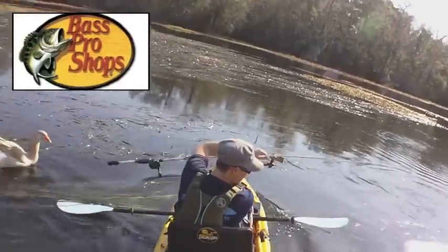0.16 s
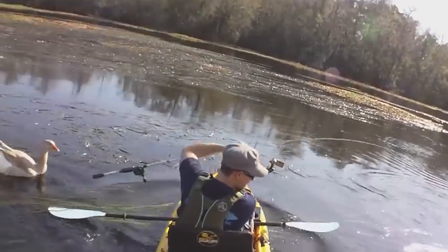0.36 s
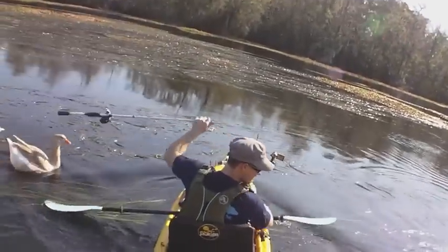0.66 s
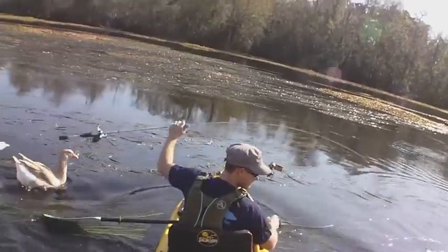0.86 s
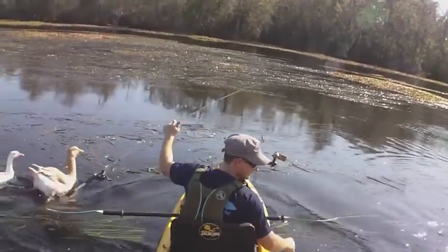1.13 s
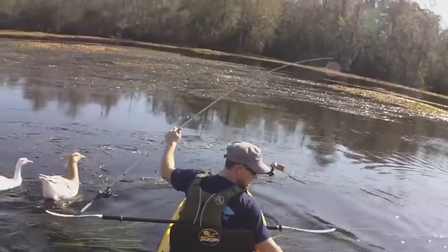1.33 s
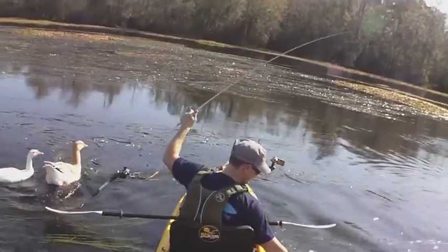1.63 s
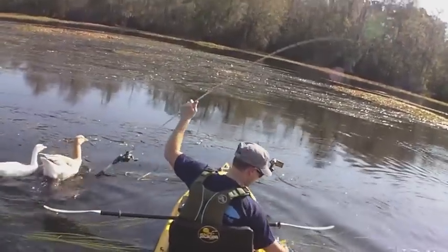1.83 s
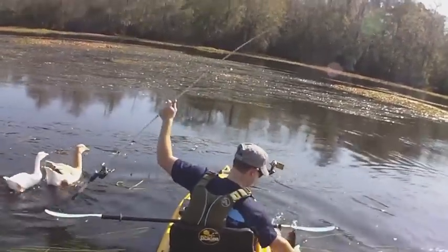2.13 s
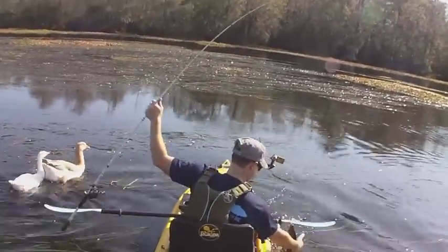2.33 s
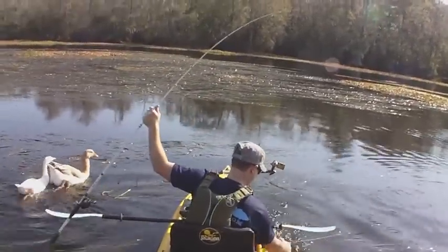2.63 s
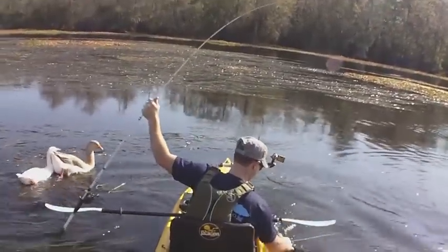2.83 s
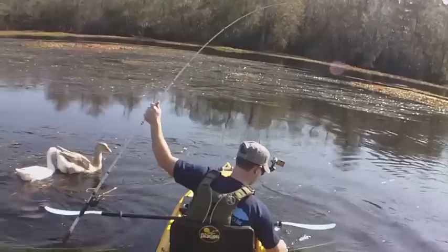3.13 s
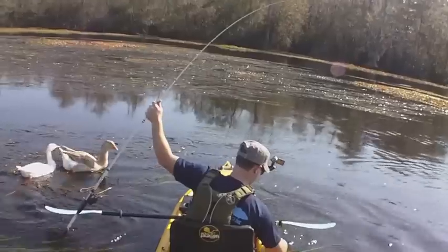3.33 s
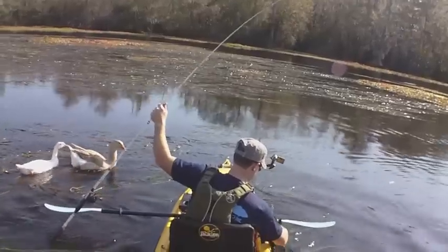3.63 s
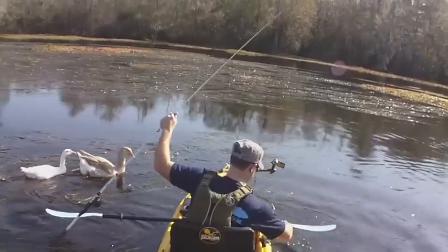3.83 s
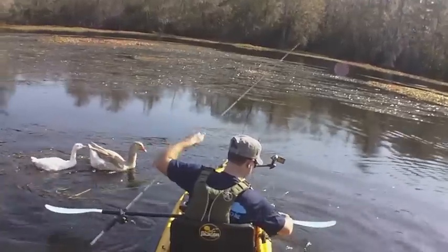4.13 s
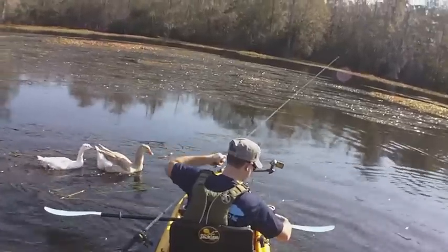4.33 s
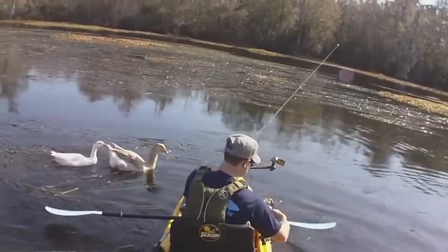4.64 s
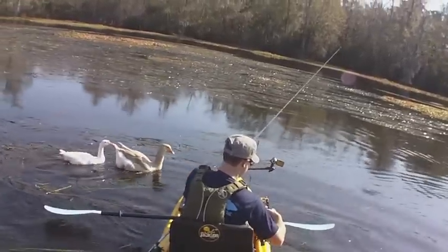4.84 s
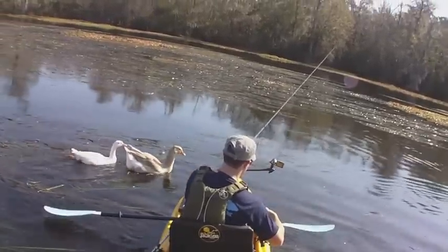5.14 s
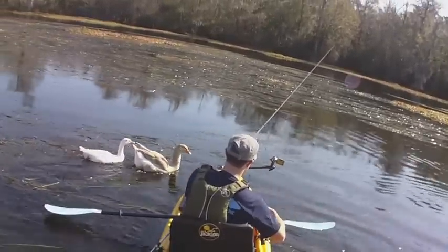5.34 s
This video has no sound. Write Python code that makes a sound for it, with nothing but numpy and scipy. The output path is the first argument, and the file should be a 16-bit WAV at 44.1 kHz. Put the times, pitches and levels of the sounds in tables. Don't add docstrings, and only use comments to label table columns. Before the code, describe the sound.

A close, dry outdoor stereo pickup from a small camera on a kayak: soft hiss, a thin steady high whine, and low wind rumble buffeting left and right unevenly. At the start water slops and gurgles gently against the plastic hull, with small low splashes around 0.4 to 0.8 seconds. From about 1.0 a hooked fish thrashes: bubbly plops, brighter wash, fine spray and a ringing rattle of steel beads in a hard lure shell near 1.2. The strongest wet slaps come around 1.8 and 2.0, with clustered bright rattles until about 2.5. The water then thins to droplets and trickles, with a small splash and faint rattle near 3.3, and is nearly still around 4. At 4.6 one hard, sharp knock hits the hull with an immediate tiny rebound, followed by small plips and a slosh near 4.9. A heavy wind thump hits the left at 5.1.

```python
import sys
import numpy as np
from scipy import signal
from scipy.fft import rfft, irfft, next_fast_len
from scipy.io import wavfile
from scipy.ndimage import uniform_filter1d

SR = 44100
rng = np.random.default_rng(int(sys.argv[2]) if len(sys.argv) > 2 else 0)


def transcribe(signal):
    frames = np.atleast_2d(signal).T
    limited = np.clip(frames, -1, 1)
    pcm = np.round(limited * 32767).astype(np.int16)
    wavfile.write(sys.argv[1], SR, pcm)


def magnitude_from_level(level_db):
    exponent = np.asarray(level_db, float) / 20
    return 10 ** exponent


N = 242197

# frequency in Hz, level in dB per Hz.
HISS_SPECTRUM = [(150, -27), (280, -2.5), (1200, -2.5), (3000, -4.5), (6800, -11), (8200, -16.5),
                 (11300, -16.5), (11700, -12.5), (15000, -11.5)]
# frequency in Hz, left level in dB, right level in dB, left lead in radians.
WHINE_TONE = (7866.5, -40, -39.5, 1.5)
# time in seconds, gust level in dB, left over right in dB.
WIND_GUSTS = [(0.0, -31, -12), (0.09, -36.5, 16), (0.15, -40.5, 0.5), (0.44, -31.5, 3), (0.69, -45.5, 3),
              (0.83, -36.5, 9), (1.08, -49, 4.5), (1.24, -26.5, 4), (1.44, -46, 2), (1.48, -32, 0.5),
              (1.59, -41.5, 8), (2.25, -35.5, 7), (2.74, -43, 1.5), (3.35, -41, 8.5), (3.38, -31.5, 14),
              (3.45, -42.5, 1), (3.82, -43.5, 7.5), (4.3, -40, 6), (4.4, -55, -5.0), (4.45, -43.5, 15),
              (4.59, -34, -2), (4.88, -38.5, 7.5), (5.0, -36.5, -6), (5.07, -26.5, 11), (5.14, -42.5, -2),
              (5.29, -47.5, 2), (5.35, -37, 17.5), (5.49, -42, -9)]
# frequency in Hz, level in dB per Hz.
LIGHT_AIR = [(8.8, -34.5), (15, 13), (42, -4), (65, -23.5), (135, -29), (445, -50.5), (500, -43.5),
             (650, -55), (1100, -120)]
# frequency in Hz, level in dB per Hz.
FULL_GUST = [(8.8, -38), (15, -6), (134, 1), (170, -3.5), (247, -13), (420, -16.5), (550, -38), (920, -120)]
# time in seconds, peak in dB, frequency in Hz, left over right in dB, push-pull phase in radians.
EDDIES = [
    (0.09, -18, 91.5, 17, 0.69),
    (0.383, -37, 121, -1, 0.98),
    (1.249, -19, 139, 11, 0.54),
    (1.491, -21, 66, 0, 0.42),
    (3.378, -16.5, 51.1, 3, 0.8),
    (4.717, -14.5, 120.4, 12, 0.8),
    (5.029, -34.5, 59.2, 1.5, 0.8),
    (5.069, -5.5, 100, 19, 0.92),
    (5.359, -41.5, 51.1, 5.0, 0.8),
]
# time in seconds, slosh in dB, brightness of its upper half in dB.
HULL_SLOSH = [(0, -36.5, -12), (.05, -43, -3.5), (.4, -43.5, -10.5), (.43, -33, -22), (.47, -40.5, -15),
              (.54, -43.5, -16), (.62, -62, -8), (.78, -51.5, -4), (.815, -38, -8), (.83, -32, -15.5),
              (.99, -34.5, -18), (1.02, -32.5, -0.5), (1.09, -32.5, -10.5), (1.13, -25.5, -9),
              (1.17, -32.5, -2), (1.22, -29.5, -4), (1.37, -34, -3.5), (1.39, -42, -2), (1.43, -45, -4),
              (1.45, -29.5, -12), (1.48, -46.5, -1), (1.57, -41, 1), (1.63, -33.5, -3), (1.67, -42, -0.5),
              (1.765, -33.5, -11), (1.81, -35.5, -3), (1.93, -29.5, -8.5), (2.0, -30, -7), (2.1, -39, -7),
              (2.2, -39, -4), (2.23, -50.5, 4), (2.42, -42.5, 3), (2.5, -50.5, 0), (2.7, -54.5, 0),
              (2.76, -47, -15), (2.83, -60, -4), (3.18, -62, -8), (3.24, -49, -12), (3.32, -52.5, -1),
              (3.6, -67, -4), (4.62, -72, -8), (4.64, -50, -6), (4.68, -61, 0), (4.9, -50, -4),
              (5.0, -63, -11)]
# time in seconds, spray in dB, gurgle in dB.
SPRAY_AND_GURGLE = [(0, -53.5, -41), (.38, -58, -43.5), (.45, -59.5, -32.5), (.6, -64, -60),
                    (.75, -55.5, -59), (.85, -47, -60), (1.0, -48.5, -56), (1.03, -38.5, -62),
                    (1.25, -37.5, -40.5), (1.38, -39, -49), (1.41, -39.5, -66), (1.59, -41.5, -60),
                    (1.96, -37.5, -53), (2.18, -46, -45), (2.48, -53, -64.5), (2.95, -58, -60),
                    (3.3, -58, -62.5), (3.7, -65.5, -60.5)]
# frequency in Hz, level in dB per Hz.
SLOSH_SPECTRUM = [(120, -43.5), (200, -0.5), (343, -8.5), (446, -9), (580, 1.5), (700, -2.5), (878, -0.5),
                  (1770, -0.5), (3040, -10.5), (4000, -14.5), (5200, -45.5), (8800, -120)]
# frequency in Hz, level in dB per Hz.
SPRAY_SPECTRUM = [(1500, -9), (3000, -11.5), (4500, 1), (6000, -0.5), (8000, -1.5), (11000, -1.5),
                  (14000, -6), (15500, -16.5)]
# start in seconds, end in seconds.
THIN_HISS_LULLS = [(.35, 0.41), (.42, .46), (.62, 0.75), (2.91, 3.13), (3.2, 3.24), (3.55, 3.69), (3.76, 3.8),
                   (3.88, 4.29), (4.42, 4.47), (4.88, 5.13), (5.22, 5.28), (5.35, 5.49)]
# time in seconds, peak in dB, centre in Hz, relative treble in dB, length in seconds.
TAIL_SLAPS = [(0.027, -27, 1650, -1.5, 0.012), (0.417, -25, 550, -32, 0.01), (0.499, -23, 615, -25, 0.02),
              (0.528, -19.5, 643, -32, 0.0064), (0.753, -38, 2040, -5, 0.012),
              (0.827, -22.5, 890, -11.5, 0.026), (1.439, -19, 630, -22, 0.012),
              (1.778, -13, 487, -8, 0.011), (1.783, -8.5, 1250, -19.5, 0.01),
              (2.014, -10.5, 2850, -1, 0.013), (2.026, -18.5, 525, -20, 0.02),
              (2.077, -10.5, 1730, -21, 0.008), (2.246, -25.5, 1510, -12, 0.0048),
              (2.876, -36, 2010, -16, 0.011), (3.233, -27, 546, -29, 0.011),
              (3.256, -33.5, 860, -25, 0.012), (3.296, -37, 1110, -2, 0.012),
              (3.348, -33.5, 1900, 0, 0.0073), (3.379, -36, 417, -20, 0.012),
              (3.751, -39.5, 2480, -8, 0.012), (4.766, -32, 432, -26, 0.0076),
              (4.894, -22, 644, -28, 0.0049)]
# time in seconds, peak in dB, start
# frequency in Hz, ring t60 in seconds, pitch rise per ring as a fraction (negative falls).
SINGLE_BUBBLES = [(0.577, -21, 249, 0.12, 0.16), (1.039, -15.5, 787, 0.052, 0.17),
                  (1.137, -5, 721, 0.037, 0.15), (1.152, -12, 1390, 0.029, 0.26),
                  (1.513, -23.5, 1346, 0.072, 0.12), (1.866, -20, 651, 0.038, 0.22),
                  (1.926, -7.5, 450, 0.068, 0.38), (2.074, -18, 1583, 0.097, 0.2),
                  (2.669, -41, 530, 0.058, 0.18), (3.037, -33, 1275, 0.077, 0.14),
                  (3.486, -36.5, 1140, 0.074, 0.2), (4.789, -33, 1240, 0.045, 0.19),
                  (4.896, -21, 660, 0.061, 0.2),
                  (.153, -25, 2490, 0.018, 1), (.503, -25, 3800, .01, 1), (1.437, -10, 1900, 0.0085, .1),
              (.886, -22, 2420, 0.044, .1), (1.59, -31, 730, 0.054, 3), (1.619, -23.5, 994, 0.065, .3),
              (2.277, -21.5, 2750, 0.027, -0.2), (2.288, -23, 1700, 0.05, 2),
              (2.65, -40, 1005, 0.066, -0.2), (2.738, -28, 1140, 0.03, 0.3), (2.76, -34, 643, 0.046, 1.5),
              (3.39, -37, 1340, .05, 1), (3.68, -51, 4200, .5, -2), (4.07, -47.5, 522, 0.27, 4.5),
              (4.06, -26, 5800, 0.0092, 1), (4.485, -38, 5070, 0.067, .01), (4.697, -30, 2280, 0.03, 0.5),
              (4.821, -21, 1163, 0.036, 4.5), (4.829, -29, 3600, 0.048, -0.5)]
# time in seconds, level in dB, relative crack in dB.
HULL_KNOCKS = [
    (4.5871, -3.5, 15),
    (4.5993, -22, 24),
]
# frequency in Hz, level in dB, ring t60 in seconds.
HULL_MODES = [(407, -15, 0.098), (708, -6, .09), (1004, -3.5, 0.076), (1200, -4, 0.072), (1900, 7, 0.029),
              (2290, -4, 0.029), (2580, 0, .04), (4770, -2, 0.043)]
# time in seconds, overall level in dB, a level for the bare tick alone in
# relative dB, shell modes up to 12.6 kHz in relative dB, shell modes from 13.5 kHz in relative dB (the tick
# follows the highest of these three, at least 0), frequency in Hz towards which water loading draws the lowest
LURE_SHAKES = [(0.0243, -40, 2, -18, -14, 6410), (1.1238, -38, 15, 12, 6, 6570),
               (1.1548, -27.5, 12, 9, -5, 6450), (1.1872, -5, -5.5, -18, -31, 6320),
               (1.3264, -25.5, -22, -6.5, -4, 6410), (1.3374, -19, -17.5, -2, -3, 6310),
               (1.6576, -32.5, -6, 8.5, 3, 6400), (1.8906, -13.5, 4, -10.5, -8, 6500),
               (1.9194, -28.5, -4.5, 11, 7, 6510), (2.0113, -8.5, 6.5, 0, -21, 6540),
               (2.0244, -13, -12, -16, -23, 6550), (2.0444, -19, -13, -9.5, -19, 6570),
               (2.0712, -17, -13.5, -3, -10, 6600), (2.1635, -30.5, 9, 1.5, -8, 6500),
               (2.1764, -22.5, 9.5, -4, -10, 6600), (2.2318, -24.5, -30.5, -29, -23, 6600),
               (2.3087, -8, 7, -7.5, -9, 6450), (2.3486, -23.5, -8, 0, -11, 6450),
               (2.5054, -22.5, -12, -1.5, -15, 6490), (2.5177, -15.5, -20, -12.5, -14, 6520),
               (2.592, -35, 1, -3, -11, 6560), (3.2969, -35.5, -3, 2, -7, 6460),
               (3.3503, -27, -8, -11, -23, 6640), (4.0607, -38.5, -77, -14.5, -30, 6480),
               (4.3166, -39.5, -12, 5.5, -16, 6560), (4.4817, -27.5, -4, -4, -9, 6470),
               (4.8135, -49.5, -8, 8, 1, 6500), (5.1582, -45.5, 4.5, -3, -13, 6600)]
# frequency in Hz, level in dB, ring t60 in seconds, mode group as a number.
SHELL_MODES = [(6500, -7, 0.42, 2), (6600, 1, 0.056, 2.5), (9086, -8, 0.23, 2), (9214, -2.5, 0.052, -2.5),
               (9900, -3.5, 0.055, 2), (12100, -5, 0.22, 2), (12130, 1.5, .05, 2), (12600, -10, .06, 2),
               (13500, -2.5, 0.22, 3), (13800, 4, 0.058, 3), (15200, -7, 0.19, 3)]
# frequency in Hz, left over right in dB.
PORT_LEVEL = [(60, 2.5), (180, 4.0), (550, 2), (1650, -0.5), (4970, 0.5), (15000, 2)]
# frequency in Hz, left lead in radians.
PORT_LEAD = [(600, .12), (2000, .2), (6500, -.1), (8300, -.3), (11900, -1.0), (14100, -.3), (15000, -.7)]
# low edge in Hz,
# high edge in Hz, threshold over the hiss in dB.
MUTED_BANDS = [(6900, 7820, 3.5), (8140, 8900, 6.5), (8877, 9500, 5), (9420, 10300, 4), (10300, 11000, 3.5),
               (11160, 11600, 1.4), (15350, 17000, 34.5)]


def evened(x):
    return x / np.sqrt(np.mean(x ** 2) + 1e-20)


def read(points, hz):
    f, value = np.transpose(points)
    return np.interp(np.log(hz + 1), np.log(f + 1), value)


def curve(rows, t, column):
    return np.interp(t, *np.transpose(rows)[[0, column]])


def add(mix, s, sound):
    part = mix[..., round(s * SR):][..., :sound.shape[-1]]
    part += sound[..., :part.shape[-1]]


def band(x, order, hz, kind):
    return signal.lfilter(*signal.butter(order, hz, kind, fs=SR), x)


def ring(hz, t60, rise=0, phase=0):
    t = np.arange(round(.3 * SR)) / SR
    return magnitude_from_level(-60 * t / t60) * np.sin(2 * np.pi * hz * (t + rise * t ** 2 / (2 * t60)) + phase)


def field(colour, size, patchy_db, wide, long):
    hop = size // 4
    t = np.arange(N // hop + 5) * hop / SR
    hz = np.fft.rfftfreq(size, 1 / SR)
    a, b, patches = np.moveaxis(rng.standard_normal((len(t), len(hz), 3)), 2, 0)
    patches = evened(uniform_filter1d(uniform_filter1d(patches, long, 0), wide, 1))
    shape = magnitude_from_level(colour(t[:, None], hz[None]))
    z = (a + 1j * b) * shape * magnitude_from_level(patchy_db * patches)
    return signal.istft(z.T, nperseg=size, noverlap=size - hop)[1][:N]


def unit(db):
    return db - 10 * np.log10(np.sum(magnitude_from_level(db) ** 2, -1, keepdims=True))


def hiss():
    colour = magnitude_from_level(read(HISS_SPECTRUM, np.fft.rfftfreq(N + 3, 1 / SR)))
    shared, *own = irfft(rfft(rng.standard_normal((3, N + 3))) * colour, N + 3)[:, :N]
    return magnitude_from_level(-50.5) * evened(shared + 1.5 * np.array(own))


def camera():
    hz, left_db, right_db, lead = WHINE_TONE
    turn = 2 * np.pi * hz * np.arange(N) / SR
    level = np.sqrt(2) * magnitude_from_level(np.array([[left_db], [right_db]]))
    return hiss() + level * np.sin(turn + np.array([[lead], [0]]))


def wind():
    def colour(t, hz):
        hard = np.clip((curve(WIND_GUSTS, t, 1) + 49) / 18, 0, 1)
        return unit((1 - hard) * read(LIGHT_AIR, hz) + hard * read(FULL_GUST, hz))

    t = np.arange(N) / SR
    level, pan = curve(WIND_GUSTS, t, 1), curve(WIND_GUSTS, t, 2)
    air = np.array([evened(field(colour, 1024, 1.78, wide=2, long=4)) for _ in range(2)])
    drift = uniform_filter1d(uniform_filter1d(rng.standard_normal((2, N)), size=900), size=900)
    lumpy = (air + 0.14 * air[::-1]) * magnitude_from_level(3.4 * evened(drift))
    out = evened(lumpy) * magnitude_from_level(level + 3.5 + np.array([pan, -pan]) / 2)
    for s, db, hz, pan_db, phase in EDDIES:
        u = np.arange(-2000, 2000) / SR * hz
        push = np.cos(2 * np.pi * u + phase) * np.exp(-(u / 0.3) ** 2)
        add(out, s - .0405, magnitude_from_level(db - 5.0) * push * magnitude_from_level(np.array([[pan_db], [-pan_db]]) / 2))
    return out


def grains(lo_hz, hi_hz, cycles, per_s, spread_db):
    out = np.zeros(N)
    t = np.arange(3000) / SR
    for hz in np.geomspace(lo_hz, hi_hz, 16):
        where, size = rng.random((400, 2)).T[:, :round(per_s / 16 * N / SR)]
        train = np.zeros(N)
        train[(where * N).astype(int)] = magnitude_from_level(spread_db * np.minimum(-np.log(size + 1e-9), 4))
        bubble = ring(hz, cycles / hz, .35)[:3000] * np.minimum(t * hz / 2.4, 1)
        out += signal.oaconvolve(train, bubble)[:N] * magnitude_from_level(read(SLOSH_SPECTRUM, hz))
    return out / np.sqrt(uniform_filter1d(out ** 2, size=6000) + 1e-9)


def slosh():
    t = np.arange(N) / SR
    wash = evened(field(lambda t, hz: read(SLOSH_SPECTRUM, hz) + 0 * t, 256, 5.0, wide=2, long=10))
    body = magnitude_from_level(-4.5) * wash + magnitude_from_level(-5.0) * grains(451, 2766, 25.6, 600, 4.5)
    upper = band(body, 2, 1300, "high")
    bright = magnitude_from_level(np.clip(curve(HULL_SLOSH, t, 2) + 7.0, -15, 6))
    return magnitude_from_level(curve(HULL_SLOSH, t, 1)) * (body + (bright - 1) * upper)


def spray_and_gurgle():
    t = np.arange(N) / SR
    spray = evened(field(lambda t, hz: read(SPRAY_SPECTRUM, hz) + 0 * t, 256, 3.7, wide=30, long=5))
    out = magnitude_from_level(curve(SPRAY_AND_GURGLE, t, 1) + 4.5) * spray
    out += magnitude_from_level(curve(SPRAY_AND_GURGLE, t, 2) - 1.5) * grains(230, 620, 12, 140, 2.3)
    thin_band = signal.butter(6, [8200, 11600], "band", fs=SR, output="sos")
    thin_hiss = evened(signal.sosfilt(thin_band, rng.standard_normal(N)))
    sounding = np.prod([(t < a) | (t > b) for a, b in THIN_HISS_LULLS], 0)
    return out + magnitude_from_level(-59.5) * thin_hiss * sounding


def slaps():
    out, u = np.zeros(N), np.arange(3000) / SR
    for s, db, hz, treble_db, length in TAIL_SLAPS:
        low, high = rng.standard_normal((2, len(u)))
        low = evened(band(low, 2, [hz / 2.5, hz * 1.72], "band"))
        high = evened(band(high, 2, 3300, "high"))
        fade = np.minimum(u / 0.00078, 1) * np.exp(-u / np.clip(length, .002, .04) * 2)
        add(out, s - .001, magnitude_from_level(db - 2.0) * (low * fade + magnitude_from_level(treble_db) * high * fade ** 0.53))
    return out


def bubbles():
    out = np.zeros(N)
    for s, db, hz, t60, rise in SINGLE_BUBBLES:
        bubble = ring(hz, t60, rise)
        flutter_db = 3.6 * evened(uniform_filter1d(rng.standard_normal(len(bubble)), size=90))
        onset = np.minimum(np.arange(len(bubble)) / SR * hz / 1.8, 1)
        add(out, s - .001, magnitude_from_level(db - 4.85 + flutter_db) * bubble * onset)
    return out


def water():
    return slosh() + spray_and_gurgle() + slaps() + bubbles()


def knock():
    out, u = np.zeros(N), np.arange(6000) / SR
    for s, db, crack_db in HULL_KNOCKS:
        body = sum(magnitude_from_level(mode_db - 8.0) * ring(hz, t60 * 0.83) for hz, mode_db, t60 in HULL_MODES)[:len(u)]
        crack = band(rng.standard_normal(len(u)), 1, [3000, 7500], "band") * np.exp(-u / 0.0005)
        tail = evened(band(rng.standard_normal(len(u)), 3, [400, 2700], "band")) * np.exp(-u / 0.01)
        blow = body + magnitude_from_level(crack_db) * crack + magnitude_from_level(-4.0) * tail
        add(out, s, magnitude_from_level(db) * blow * np.minimum(u / 0.00063, 1))
    return out


def bead_clicks():
    when, size = rng.random(30) ** 3.2, rng.standard_normal(30)
    clicks = np.zeros(round(.09 * SR))
    clicks[(when * (len(clicks) - 1)).astype(int)] = size * np.exp(-when / 0.18)
    clicks[0] = 1.3
    return clicks / np.linalg.norm(clicks)


def lure():
    out = np.zeros(N)
    for s, db, *groups_db, low_hz in LURE_SHAKES:
        clicks = bead_clicks()
        swing = 0.052 * np.cumsum(rng.standard_normal(round(.3 * SR)))
        shell = np.zeros(len(swing))
        for hz, mode_db, t60, group in SHELL_MODES:
            detune = rng.standard_normal()
            group_db = ([0] + groups_db)[int(round(group))]
            loaded_hz = hz * (low_hz / 6500) ** 0.595 * (1 + 0.0045 * detune)
            shell += magnitude_from_level(mode_db + group_db) * ring(loaded_hz, t60, 0, swing * (1 + detune))
        shell[:3] += magnitude_from_level(max(0, *groups_db) + 5.5) * np.array([1, -2, 1])
        add(out, s - .001, magnitude_from_level(db - 1.0) * signal.fftconvolve(clicks, shell))
    return out


def ports(x, scatter_db):
    size = next_fast_len(N + 4096)
    hz = np.fft.rfftfreq(size, 1 / SR)
    held_hz = np.maximum(hz, 600)
    half = magnitude_from_level(read(PORT_LEVEL, held_hz) / 2) * np.exp(.5j * read(PORT_LEAD, held_hz))
    u = np.arange(2600) / SR
    sparse = rng.standard_normal((2, len(u))) * (rng.random((2, len(u))) < .05)
    taps = sparse * np.exp(-u / 0.007) * (u > .002)
    taps /= np.linalg.norm(taps, axis=1, keepdims=True)
    scatter = rfft(taps, size) * magnitude_from_level(scatter_db) * (hz / 5000) ** .6
    return irfft(rfft(x, size) * (np.array([half, 1 / half]) + scatter), size)[:, :N]


def mute_quiet_treble(x):
    hz, t, z = signal.stft(x, SR, nperseg=1024)
    power = uniform_filter1d(np.mean(abs(z) ** 2, 0), size=3)
    level_db = 10 * np.log10(power[(hz > 8900) & (hz < 11300)].mean(0) + 1e-20)
    over_hiss_db = level_db - np.percentile(level_db, 10)
    for lo, hi, threshold_db in MUTED_BANDS:
        z[:, (hz >= lo) & (hz < hi)] *= np.clip((over_hiss_db - threshold_db) / 0.22, 0, 1)
    return signal.istft(z, SR, nperseg=1024)[1][:, :N]


def scene():
    return camera() + wind() + ports(water() + knock() + lure(), -19.0)


def top_cut(x):
    return signal.sosfilt(signal.butter(12, 16640, fs=SR, output="sos"), x)


def record(dry):
    edges_hz = [0, 15300, 15600, 16700, SR / 2]
    taps = signal.firwin2(255, edges_hz, [1, 1, 0.03, .02, 0.089], fs=SR)
    rolled = signal.oaconvolve(dry, taps[None], "same")
    overloaded = 0.83 * np.tanh(rolled / 0.87)
    return top_cut(mute_quiet_treble(overloaded))


dry = scene()
out = record(dry)
transcribe(out)
```